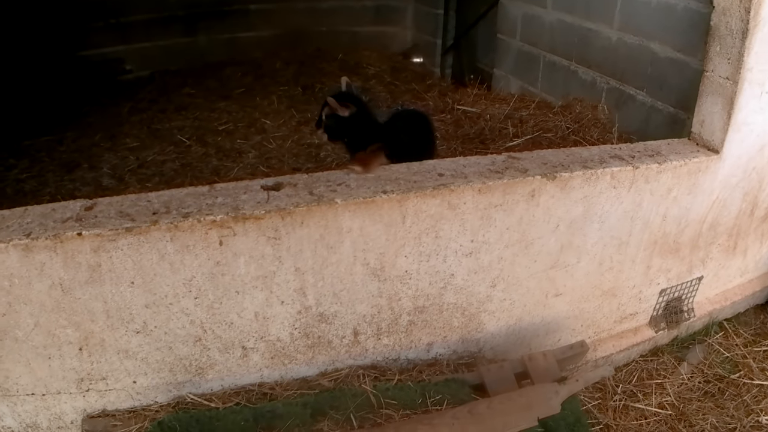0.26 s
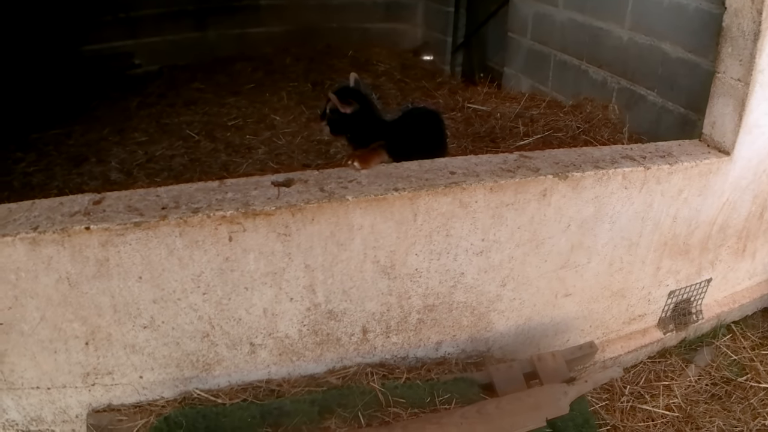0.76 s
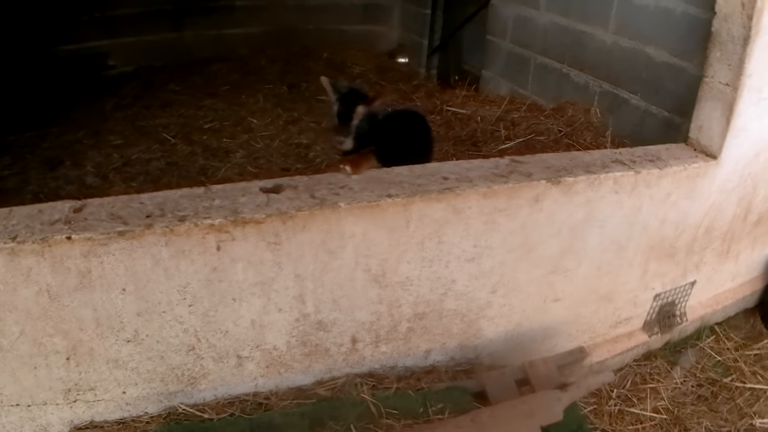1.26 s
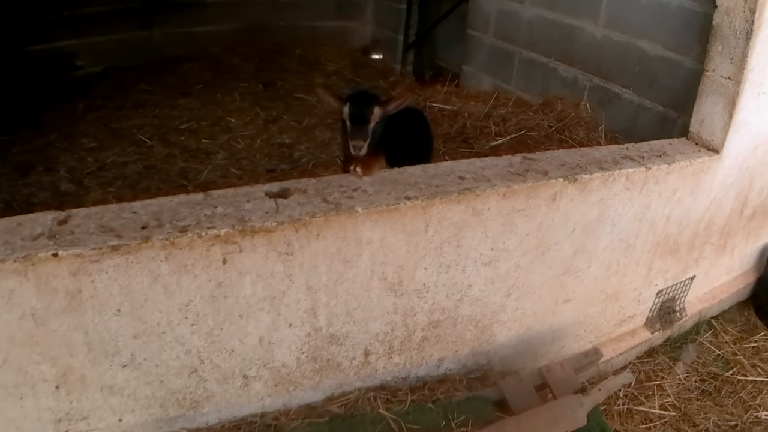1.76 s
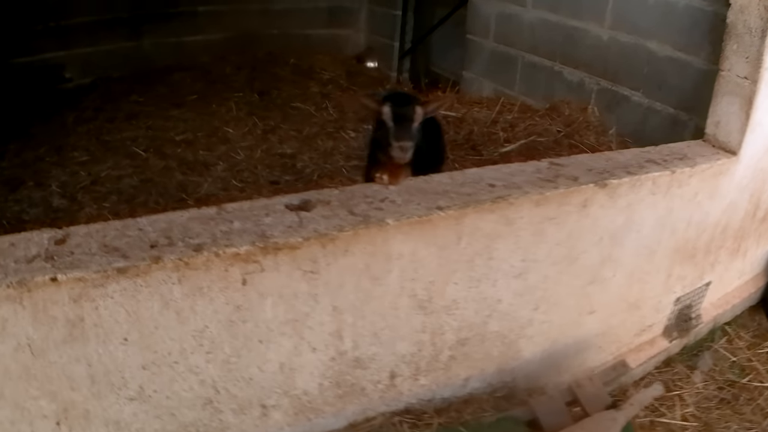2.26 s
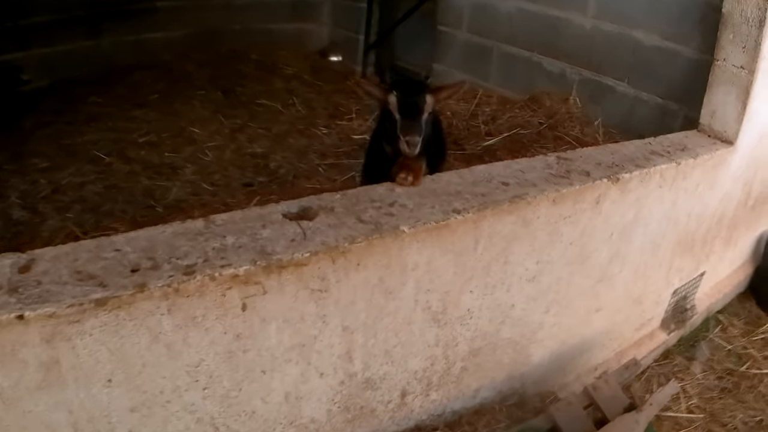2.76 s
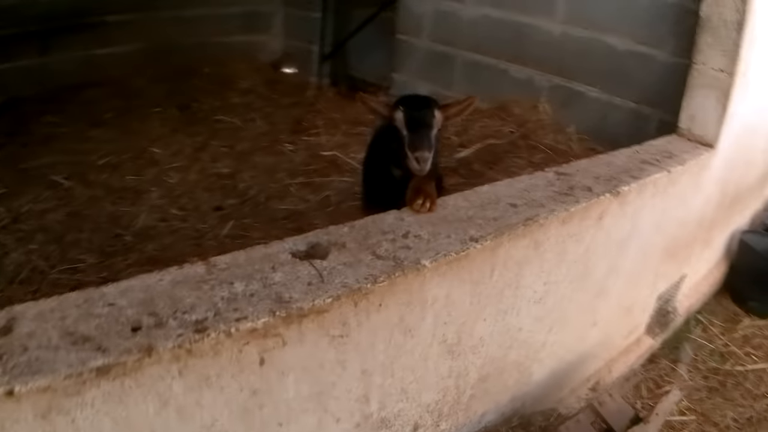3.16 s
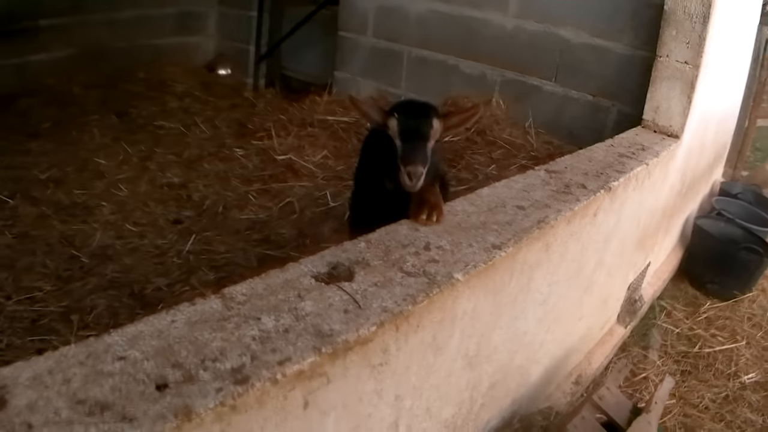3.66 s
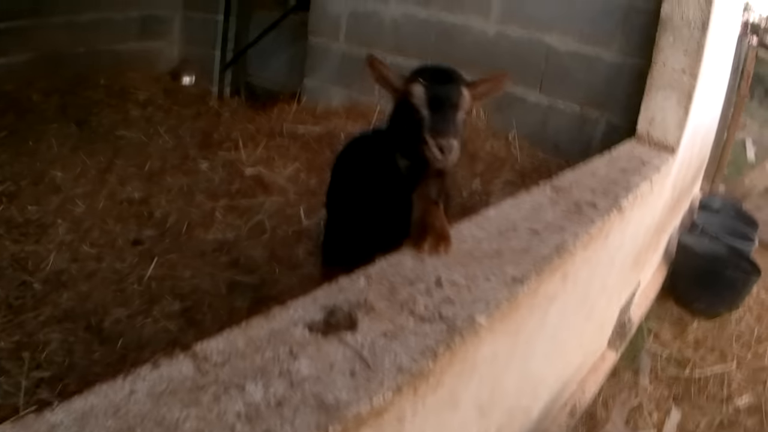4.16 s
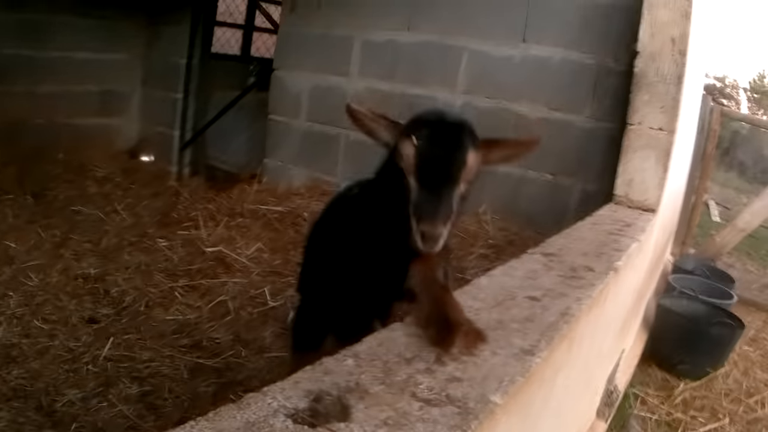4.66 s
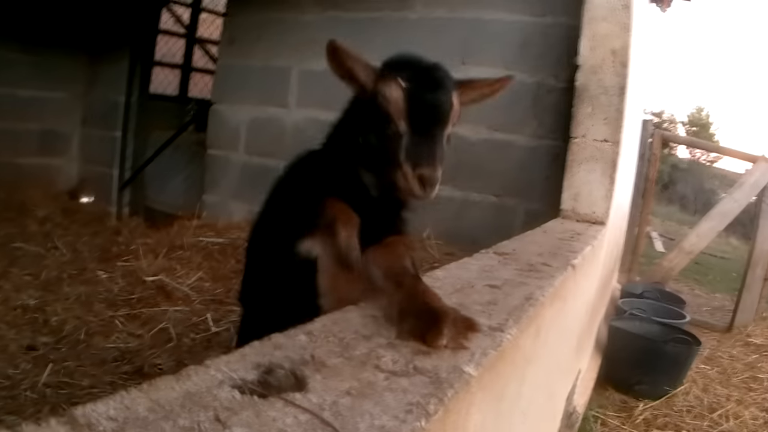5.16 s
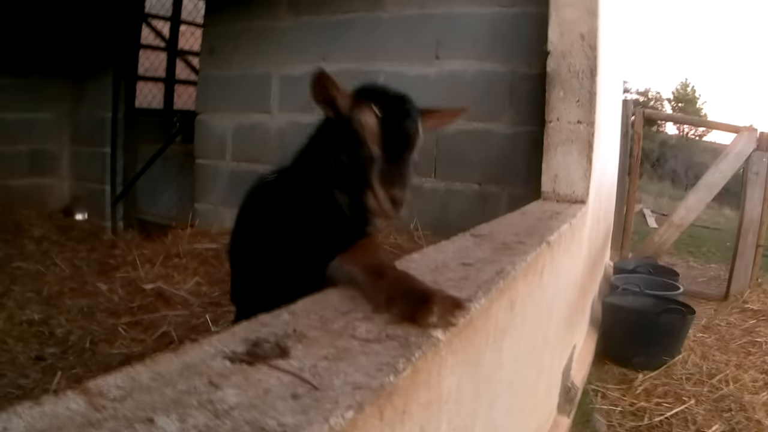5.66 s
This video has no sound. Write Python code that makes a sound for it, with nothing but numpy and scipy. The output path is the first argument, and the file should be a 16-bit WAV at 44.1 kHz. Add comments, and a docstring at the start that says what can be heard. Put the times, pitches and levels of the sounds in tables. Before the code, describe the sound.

A young goat moves in a straw-bedded block pen. Its dull metal bell clanks and hooves thud at first; one short, high, quavering bleat follows. After a sparser stretch, straw rustles and the bell clatters rapidly as it climbs at the low wall, ending with a few knocks. A close handheld microphone picks up low rumble and slight room echo.

```python
"""Goat kid with a neck bell

A goat kid shifts about in a straw-bedded block pen and climbs onto the low wall, close by. Its sheet-metal bell
clanks: a choked main note with a beating partner, overtones and clapper ticks. It bleats once, quavering:
harmonics through mouth and throat colours, with puffs of breath. Hooves ring and thud, straw noise rustles and
snaps, air rumbles on the microphone, and soft low bumps sound."""
import sys
import numpy as np
from scipy import signal
from scipy.io import wavfile

SR = 44100
rng = np.random.default_rng(int(sys.argv[2]) if len(sys.argv) > 2 else 0)


def waveform_to_disk(signal):
    """Save audio, clipped to [-1, 1], as 16-bit WAV at the path in sys.argv[1]."""
    frames = np.transpose(np.atleast_2d(signal))
    scaled = np.clip(frames, -1, 1) * 32767
    samples = np.round(scaled).astype(np.int16)
    wavfile.write(sys.argv[1], SR, samples)


N = 261072
TIME = np.arange(N) / SR

# All layer levels are relative; the functions add gains.
# air rumble on the microphone: (time [s], level [dB])
AIR_LEVEL = [(0, -41.5), (0.3, -36), (0.55, -39.5), (1.85, -39.5), (2.0, -45), (2.27, -42.5), (2.45, -37),
             (4.4, -39.5), (5.1, -36), (5.92, -37)]
# soft low bumps: (time [s], level [dB], pitch [Hz])
LOW_BUMPS = [(0.277,-25,55),(0.566,-22,50),(0.659,-18.5,60.5),(0.956,-21.5,64.1),(1.286,-16,62),(1.472,-19.5,55.2),(1.848,-21.5,74.5),
             (2.527,-20.5,50.6),(5.028,-23,53.3),(5.604,-18,40),(5.836,-24,71.6)]
# rumble spectrum: (frequency [Hz], density [dB per Hz])
RUMBLE_SPECTRUM = [(18, 1.5), (35, -7), (70, -8.5), (130, -13), (300, -17.5), (800, -61.5)]
# straw rustle spectrum: (frequency [Hz], density [dB per Hz])
RUSTLE_SPECTRUM = [(600, 7.5), (1100, 12.5), (1500, 3.5), (2000, 3.5), (2600, 4.5), (3200, -7.5),
                   (3800, -7), (4500, -16), (5200, -24.5), (6500, -35), (8500, -68.5)]
# dull shuffling spectrum: (frequency [Hz], density [dB per Hz])
SHUFFLE_SPECTRUM = [(60, -5), (130, -1.5), (300, 0), (600, -3), (1000, -6), (1600, -11.5), (2500, -27),
                    (4000, -30.5)]
# moves that stir the straw: (peak time [s], peak level [dB], rise by 20 dB [s], t60 [s])
STRAW_MOVES = [(0.3, -41, 0.023, 0.076), (0.99, -45.5, 0.049, 0.18), (1.38, -50.5, 0.02, 0.13),
               (1.519, -56, 0.13, 2.53), (2.15, -47, 0.49, 0.9), (2.741, -41, 0.032, 0.094),
               (3.42, -46.5, 0.11, 1.8), (3.79, -37.5, 0.04, 2), (3.968, -38, 0.29, 1.43),
               (4.52, -41.5, 0.78, 0.94), (5.899, -51, 1, 2.6)]
# dry stalks sliding: (peak time [s], peak level [dB], rise by 20 dB [s], t60 [s])
STALK_SWISHES = [(0.05,-55,0.09,.5),(0.53,-57,.1,0.47),(0.95,-64,0.028,.25),(1.19,-53,0.14,0.24),(1.47,-52.5,.1,0.49),(2.2,-44,.3,0.44),(2.51,-54.5,0.1,0.46),(3.45,-54.5,0.21,.6),(3.92,-47,0.37,1.65)]
# harsh resonances of hard scrambling: (frequency [Hz], level [dB])
SCRAMBLE_RASP = [(1660, -18), (2417, -1.5), (2560, -2), (2760, -4.5)]
# straw stalks snapping: (time [s], level [dB], centre [Hz])
STALK_SNAPS = [(0.2885,-27,3410),(0.2996,-28,3430),(0.3074,-34,3280),(0.401,-43,3204),(0.44,-39,1993),(2.35,-32.5,2420),
               (2.643,-39,2285),(2.718,-24,1984),(2.725,-30.5,2800),(2.737,-38.5,2320),(3.883,-17.5,2363),(5.021,-37,2885),(5.173,-29,2380)]
# hoof steps, low on straw, high on the bare wall: (time [s], hollow ring [dB], ring pitch [Hz],
# t60 of thud and knock [s], thud [dB], knock [dB], grit [dB])
HOOF_STEPS = [(0.615,-14.5,352,0.21,-23.5,-26,-34.5),(0.657,-14,281,0.071,-17.5,-34.5,-54),(0.713,-35,151.4,0.37,-24,-32.5,-46),
              (0.826,-24.5,1370,0.051,-40.5,-38.5,-36.5),(1.034,-13.5,376.2,0.12,-26,-24,-31.5),(1.174,-17,312,0.27,-34.5,-26.5,-42.5),
              (1.221,-19,150,0.07,-28.5,-36,-33.5),(1.376,-25,400,0.063,-45.5,-29.5,-55),(1.457,-13,170.5,0.076,-19.5,-46.5,-53.5),
              (1.544,-33,190,0.11,-31.5,-25,-45),(1.617,-22,189,0.067,-32.5,-20.5,-35.5),(2.35,-16.5,333,0.2,-23.5,-19,-33),
              (2.38,-19,386,0.24,-45.5,-31.5,-41.5),(2.462,-17.5,319,0.069,-36.5,-30.5,-43),(2.522,-20,217,0.055,-31.5,-31,-54),
              (2.644,-17,707.4,0.061,-31,-18.5,-31.5),(2.72,-13.5,684.5,0.085,-37.5,-13.5,-26),(2.736,-18,993,0.094,-29,-20.5,-24.5),
              (3.588,-24,666.5,0.11,-33.5,-22.5,-31),(3.839,-14,327,0.47,-30,-28,-42),(4.164,-12,358.2,0.2,-31.5,-25.5,-38.5),(4.184,-15.5,323,0.09,-40.5,-29.5,-43),
              (4.295,-14,225.9,0.17,-26,-24.5,-32),(4.575,-26.5,487,0.055,-28.5,-28,-34),(5.277,-7,477.7,0.19,-22.5,-14.5,-43),(5.332,-16,512,0.18,-29.5,-35,-37.5),
              (5.435,-30.5,154.8,0.13,-24.5,-26.5,-47),(5.832,-12,190,0.13,-22.5,-55,-48)]
# arch of the bleat as the mouth opens and shuts: (time [s], pitch before the quaver [Hz],
# fundamental [dB], mouth resonance [dB], overtones [dB])
BLEAT_ARCH = [(1.79,367.6,-58.5,-64,-74.5),(1.82,424.4,-23.5,-40.5,-66),(1.85,580.6,-27,-31.5,-50),(1.905,570,-30,-37.5,-48.5),(1.945,565,-20,-26,-33.5),(1.985,582,-32,-28,-41.5),
              (2.04,588.5,-33.5,-15.5,-31.5),(2.13,589,-33,-11,-35),(2.18,595,-32.5,-14.5,-30),(2.215,599,-30,-12,-28.5),(2.252,588,-33,-13.5,-31),
              (2.278,496,-32,-22,-25.5),(2.293,418,-37,-19,-30.5),(2.301,398,-49.5,-24,-33),(2.335,369,-57,-43,-56)]
# instants where the voice catches: (time [s])
VOICE_BREAKS_S = [2.066, 2.088, 2.161, 2.195]
# throat colour above the mouth resonance: (frequency [Hz], level [dB])
THROAT_COLOUR = [(1500, -45.5), (1800, -11.5), (2400, -1), (3000, -21), (3600, -17.5), (4200, -22.5),
                 (4800, -19), (5400, -48), (6100, -30.5), (7300, -36), (8600, -46.5), (9600, -60)]
# clapper blows and bounces: (time [s], main note level [dB], nominal pitch [Hz], rise [s], t60 [s],
# first overtone family [dB], second family [dB], upper family [dB])
BELL_STRIKES = [(0.073, -15.0, 854, 0.022, 0.088, -62, -60, -64),
                (0.169, -8.5, 855, 0.008, 0.27, -54, -55, -64),
                (0.214, -24, 862, 0.016, 0.12, -56, -53, -67),
                (0.318, -24.5, 848, 0.005, 0.22, -62.5, -55, -62.5),
                (0.491, -6.5, 857, 0.0083, 0.22, -36, -44, -47),
                (0.535, -9, 858, 0.027, 0.053, -35.5, -46, -46.5),
                (0.588, -18.5, 844, 0.0076, 0.45, -38.5, -49, -53.5),
                (0.607, -8.5, 841, 0.009, 0.28, -44.5, -51, -55.5),
                (0.663, -14, 860, 0.0077, 0.14, -49, -53.5, -57),
                (0.712, -17.5, 847, 0.0095, 0.16, -59.5, -48.5, -66),
                (0.784, -17, 834, 0.014, 0.09, -47, -55, -69),
                (0.815, -19.5, 858, 0.005, 0.42, -49, -53, -69),
                (0.895, -24, 847, 0.017, 0.4, -53, -60, -72.5),
                (1.085, -28, 855, 0.009, 0.38, -56, -58, -71),
                (1.21, -18, 864, 0.0087, 0.26, -50, -56, -69),
                (1.309, -19.5, 858, 0.0061, 0.24, -66, -63, -67),
                (1.562, -24, 851, 0.041, 0.1, -52.5, -60, -62.5),
                (1.713, -19.0, 866, 0.034, 0.071, -43, -57, -69),
                (1.87, -24, 874, 0.0039, 0.12, -55, -53, -71),
                (2.418, -26.5, 870, 0.0048, 0.27, -51, -62, -69),
                (2.865, -27.5, 851, 0.018, 0.34, -59, -58, -65),
                (3.044, -17.5, 837, 0.0086, 0.29, -45.5, -49.5, -78),
                (3.345, -19.5, 849, 0.01, 0.3, -51, -68, -57),
                (3.529, -9.5, 851, 0.0099, 0.12, -40.5, -57, -64),
                (3.545, -6.5, 850, 0.021, 0.18, -38.5, -49, -56.5),
                (3.663, -6, 848, 0.0076, 0.04, -44, -38, -50.5),
                (3.679, -8, 831, 0.0041, 0.25, -55, -51, -56),
                (3.714, -10, 830, 0.0071, 0.21, -45, -43.5, -54),
                (3.771, -3.5, 836.4, 0.053, 0.26, -32, -40, -51),
                (3.866, -4.5, 862, 0.009, 0.25, -37, -34, -38.5),
                (3.884, -4, 864, 0.012, 0.088, -36.5, -38.5, -39),
                (3.912, -17, 851, 0.0048, 0.37, -38.5, -46, -40.5),
                (3.94, -13.5, 849, 0.009, 0.51, -51.5, -38, -42.5),
                (4.015, -3.5, 871, 0.009, 0.21, -35.5, -34.5, -38.5),
                (4.035, -8.5, 877, 0.005, 0.53, -38, -29, -35),
                (4.053, -4, 858, 0.0055, 0.041, -33.5, -30.5, -42),
                (4.089, -9.0, 868, 0.012, 0.046, -34.5, -31, -44),
                (4.108, -13.5, 850, 0.0044, 0.34, -40.5, -33, -47.5),
                (4.218, -6, 854, 0.012, 0.04, -50.5, -42, -68),
                (4.24, -11.5, 844, 0.0036, 0.1, -56, -41.5, -72),
                (4.259, -13, 837, 0.006, 0.11, -50, -36.5, -68),
                (4.277, -6.5, 869, 0.017, 0.12, -59, -48.5, -55),
                (4.298, -9.5, 864, 0.0057, 0.18, -52, -39.5, -54.5),
                (4.332, -17.5, 874, 0.003, 0.24, -54.5, -48.5, -56),
                (4.446, -4.0, 837, 0.011, 0.044, -47, -35.5, -52.5),
                (4.48, -10.5, 851, 0.013, 0.11, -42, -33, -49.5),
                (4.53, -13.0, 829, 0.0099, 0.19, -44.5, -32.5, -51.5),
                (4.59, -18.5, 823, 0.0072, 0.25, -57, -43.5, -54.5),
                (4.722, -9.5, 849, 0.024, 0.27, -60, -39.5, -54.5),
                (4.82, -11.5, 850, 0.011, 0.45, -55.5, -41, -62),
                (4.845, -10, 848, 0.0049, 0.25, -51.5, -36.5, -67),
                (4.865, -10.5, 844, 0.0082, 0.13, -46, -42, -65),
                (4.98, -19.5, 836, 0.015, 0.16, -65.5, -64, -61.5),
                (5.067, -19.5, 847, 0.008, 0.11, -73, -57, -76),
                (5.103, -13, 849, 0.0074, 0.18, -51.5, -48, -69),
                (5.138, -21.5, 845, 0.012, 0.45, -60, -50.5, -59.5),
                (5.215, -10.5, 873, 0.013, 0.079, -46, -45, -57.5),
                (5.255, -12.5, 861.5, 0.056, 0.2, -49, -45, -56.5),
                (5.323, -10.5, 865.5, 0.026, 0.054, -48, -48.5, -60),
                (5.39, -27, 856, 0.0039, 0.31, -53, -46, -68),
                (5.696, -9.5, 879, 0.0094, 0.12, -46.5, -34.5, -48.5),
                (5.744, -20.5, 846, 0.0077, 0.23, -46, -42.5, -57)]
# bell overtones: (frequency [Hz], level [dB], t60 [s], family: 0 first, 1 second, 2 upper, 3 top)
BELL_OVERTONES = [(1572, -14, .1, 0), (1982, 1, .85, 0), (1998, -15, .35, 0), (2174, .5, .72, 1),
                  (2194, -15, .35, 1), (2344, -20, .3, 1), (2557, -20, .5, 1), (3779, -8, .5, 2),
                  (3814, -1, .55, 2), (4355, -12, .28, 2), (5947, -25, .25, 2), (4859, 0, .35, 3),
                  (5940, -12, .22, 3)]
# hard blows on the rim bring out the top family: (time [s], level against the upper family [dB])
RIM_BLOWS = [(0.49, -29.5), (0.54, -30), (0.6, -19.5), (3.55, -9.5), (3.663, -11), (3.773, -8),
             (3.9, -28.5), (4.014, -5), (4.22, -7.5), (4.5, -17), (5.7, -23)]
# noise spectra of swish, grit and breath: (frequency [Hz], density [dB per Hz])
SWISH_SPECTRUM = [(3500, -1.0), (4000, 6.0), (4600, -14.5), (5100, -25.5)]
GRIT_SPECTRUM = [(750, 9), (1200, 10.5), (1800, -8.5), (2500, -7.0), (3300, -30.0), (4800, -35.0)]
BREATH_SPECTRUM = [(700, 1.0), (1200, 29.0), (1800, 10.0), (2500, 10.0),
                   (3300, -13.5), (4700, -10.5), (6000, -34), (8000, -36)]

PEN_T60_S, WALL_CUT_HZ, PEN_DB = 0.61, 1300, -22.5
HISS_DB = -74
STIR_DB, SHUFFLE_DB, SWISH_DB = -57.5, -37.5, -8  # rustle between moves; shuffling; swish rest against STIR
SHUFFLE_PATCHY_DB, RASP_WIDTH_HZ = 3, 160
RING_T60_S, GRIT_PER_S = 0.063, 750
QUAVER_HZ, QUAVER_CREST_S = 11.27, 2.04  # rate; time of one crest
QUAVER_DEPTH, QUAVER_DB = 0.028, 1.5  # pitch swing at that crest [share]; mouth level swing
FALL_S, FALL_ROUGH = 2.25, .45  # voice falls away from here; hoarseness added
OFFSET, HEADROOM, STOPBAND_HZ = -.24, .85, 11000


def from_db(db):
    """Decibels to gain."""
    return 10 ** (np.asarray(db) / 20)


def rms_one(x):
    """Scale to rms 1."""
    return x / np.sqrt(np.mean(x ** 2) + 1e-20)


def in_time(rows):
    """Columns of a curve, sample by sample."""
    s, *columns = np.transpose(rows)
    return [np.interp(TIME, s, c) for c in columns]


def at_hz(points, hz):
    """Read a spectrum on a log-frequency axis."""
    point_hz, level_db = np.transpose(points)
    return np.interp(np.log(hz), np.log(point_hz), level_db)


def band(x, low_hz, high_hz, order=2):
    """Butterworth band-pass."""
    sos = signal.butter(order, [low_hz, high_hz], "band", fs=SR, output="sos")
    return signal.sosfilt(sos, x + 1e-18)


def soften(x, seconds):
    """Two one-pole lags: a step becomes a smooth rise."""
    r = np.exp(-1 / (seconds * SR))
    return signal.lfilter([(1 - r) ** 2], [1, -2 * r, r * r], x + 1e-18)


def drift(rate_hz):
    """Slow random wander with spread 1: low-passed noise on every 40th sample, interpolated."""
    step = 40
    r = np.exp(-2 * np.pi * rate_hz * step / SR)
    white = rng.standard_normal(N // step + 2002)
    slow = signal.lfilter([1], [1, -2 * r, r * r], white)[2000:]  # drop the filter's start
    return np.interp(np.arange(N) / step, np.arange(len(slow)), rms_one(slow))


def noise(spectrum, patchy_db, envelope=1):
    """Noise in narrow bands, each flickering by itself; rms 1 where the envelope is 1."""
    out, power = 0, 0
    white = rng.standard_normal((2, N)) * envelope
    bottom_hz, top_hz = spectrum[0][0], spectrum[-1][0]
    edges_hz = np.geomspace(bottom_hz, top_hz, int(2.6 * np.log2(top_hz / bottom_hz)) + 2)
    for k, (low, high) in enumerate(zip(edges_hz, edges_hz[1:])):
        gain = from_db(at_hz(spectrum, np.sqrt(low * high)) + patchy_db * drift(15))
        # neighbouring bands use separate noise
        out = out + band(white[k % 2], low, high, order=3) * gain
        power += np.mean(gain ** 2) * (high - low) / (SR / 2)
    return out / np.sqrt(power)


def bursts(envelope, low_hz, high_hz):
    """Noise bursts ringing through one band; the envelope sets their rms."""
    white = envelope * rng.standard_normal(N)
    return band(white, low_hz, high_hz, order=3) * np.sqrt(SR / 2 / (high_hz - low_hz))


def grains(per_s):
    """Random instants of contact, mean power 1: noise under this gate crackles."""
    return (rng.random(N) < per_s / SR) * np.sqrt(SR / per_s)


def dying(starts_s, level_db, t60_s):
    """Sum of envelopes that jump up at each start and die away."""
    out = np.zeros(N)
    for s, db, t60 in zip(starts_s, level_db, np.broadcast_to(t60_s, len(starts_s))):
        at = int(s * SR)
        age = TIME[:min(N - at, int(2 * t60 * SR))]
        out[at:at + len(age)] += from_db(db - 60 * age / t60)
    return out


def struck(s, db, hz, t60_s):
    """One damped swing set off at time s."""
    out, at = np.zeros(N), int(s * SR)
    age = TIME[:min(N - at, int(2 * t60_s * SR))]
    out[at:at + len(age)] = from_db(db - 60 * age / t60_s) * np.sin(2 * np.pi * hz * age)
    return out


def swells(rows, rest_db):
    """Level [dB]: each move swells by 20 dB over its rise and dies away, over a steady rest level."""
    power = from_db(rest_db) ** 2
    for s, peak_db, rise, t60 in rows:
        below_peak_db = np.maximum(20 * (s - TIME) / rise, 60 * (TIME - s) / t60).clip(max=100)
        power = power + from_db(peak_db - below_peak_db) ** 2
    return 10 * np.log10(power)


def air(rumble_db=5.0, bump_db=4.5, bump_t60_s=0.15):
    """Low rumble and faint hiss on the microphone, with soft low bumps as damped low swings."""
    swings = sum(struck(s, db + bump_db, hz, bump_t60_s) for s, db, hz in LOW_BUMPS)
    bumps = soften(swings, 0.00015)
    rumble = from_db(in_time(AIR_LEVEL)[0] + rumble_db) * noise(RUMBLE_SPECTRUM, patchy_db=5.0)
    hiss = bursts(from_db(HISS_DB), 4600, 4850)
    return bumps + rumble + hiss


def pen(x, count=10):
    """Echoes circle between the block walls, duller on every round."""
    out, dull = np.zeros(N), np.exp(-2 * np.pi * WALL_CUT_HZ / SR)
    lags = (rng.uniform(.011, .045, count) * SR).astype(int)
    for k, lag in enumerate(lags):
        loop, state = x.copy(), [0.]
        gain = from_db(-60 * lag / SR / PEN_T60_S)
        for i in range(lag, N, lag):
            back, state = signal.lfilter([gain * (1 - dull)], [1, -dull], loop[i - lag:i], zi=state)
            loop[i:i + lag] += back[:N - i]
        out += (loop - x) * (-1) ** k
    return out


def straw(rustle_db=9, grain_db=2.43, scramble_db=3, effort_db=-34, shuffle_follows=0.75,
          crackle_share=0.28, crackles_per_s=700):
    """Bedding rustles and crackles in clumps under the feet, with shuffling, swishes and rasp."""
    stir_db, air_db = swells(STRAW_MOVES, STIR_DB), in_time(AIR_LEVEL)[0]
    clumps = from_db(stir_db + grain_db * drift(150))
    crackle = np.sqrt(1 - crackle_share + crackle_share * grains(crackles_per_s) ** 2)
    rustle = noise(RUSTLE_SPECTRUM, 2.4, clumps * crackle * from_db(rustle_db))
    # shuffling partly follows the air level
    shuffle_gain = from_db(SHUFFLE_DB + shuffle_follows * (air_db - air_db.mean()))
    shuffle = shuffle_gain * noise(SHUFFLE_SPECTRUM, SHUFFLE_PATCHY_DB)
    # dry stalks swish as they slide over each other
    swish = noise(SWISH_SPECTRUM, 2.6, from_db(swells(STALK_SWISHES, STIR_DB + SWISH_DB)))
    # hard scrambling adds a harsh, ringing rasp
    scramble = clumps * np.minimum(from_db(stir_db - effort_db), 1)
    half_hz = RASP_WIDTH_HZ / 2
    rasp = sum(bursts(scramble * from_db(scramble_db + db), hz - half_hz, hz + half_hz)
               for hz, db in SCRAMBLE_RASP)
    return rustle + shuffle + swish + rasp


def snaps(t60_s=0.018, spread=1.434, fibres_per_s=5000):
    """A stalk breaks in a quick run of fibre cracks, coloured by its thickness."""
    cracks = grains(fibres_per_s) * rng.choice([-1, 1], N)
    out = np.zeros(N)
    for s, db, hz in STALK_SNAPS:
        near = slice(int(s * SR), int((s + 3 * t60_s) * SR))
        low, high = hz / spread, hz * spread
        run = (dying([s], [db], t60_s) * cracks)[near]
        out[near] += band(run, low, high, order=4) * np.sqrt(SR / 2 / (high - low))
    return out


def hooves(grit_db=7.5, grit_share=0.73, give_s=0.00045):
    """Each hoof gives a short hollow ring, a thud, a knock and a crackle of crushed grit."""
    s, ring_db, ring_hz, t60, thud_db, knock_db, step_grit_db = np.transpose(HOOF_STEPS)
    ring = sum(struck(start, db, hz, RING_T60_S) for start, db, hz in zip(s, ring_db, ring_hz))
    thud = bursts(soften(dying(s, thud_db, t60), give_s), 120, 340)
    knock = bursts(soften(dying(s, knock_db, t60), give_s), 340, 780)
    crush = dying(s, step_grit_db + grit_db, t60 * grit_share) * grains(GRIT_PER_S)
    grit = noise(GRIT_SPECTRUM, 0.4, crush)
    return band(ring + thud + knock, 55, 2300) + grit


def bleat(mouth_hz=1200, mouth_width_hz=330, overtone_quaver_db=0.5, narrow_s=0.25, jitter=0.048,
          shimmer=0.22, rasp_db=-14, hoarse_dull_db=8, tremble_db=2.9, clear_rough=0.05, dip_rough=0.14,
          break_s=0.0019, break_depth=0.55, slip=1.0, crack=3.4, unevenness=0.019):
    """A high voice through the open mouth's resonance; rougher in quaver dips and as it falls away."""
    pitch_hz, low_db, mouth_db, high_db = in_time(BLEAT_ARCH)
    start_s, end_s = BLEAT_ARCH[0][0], BLEAT_ARCH[-1][0]
    # broad crests, narrow dips; the pitch swing narrows as the call goes on
    quaver = 1 - 2 * np.abs(np.sin(np.pi * QUAVER_HZ * (TIME - QUAVER_CREST_S))) ** 3
    depth = QUAVER_DEPTH * np.exp(np.clip((QUAVER_CREST_S - TIME) / narrow_s, -1, .5))
    pitch_hz = pitch_hz * (1 + depth * quaver)
    mouth_db = mouth_db + QUAVER_DB * quaver
    # overtones swell on the crests; dips get rougher with effort
    high_db = high_db + overtone_quaver_db * quaver
    effort_db = mouth_db + 13
    rough = clear_rough + dip_rough * np.maximum(-quaver, 0) * from_db(effort_db / 2)
    rough = rough + FALL_ROUGH * np.clip((TIME - FALL_S) / 0.028, 0, 1)
    pitch_hz = soften(pitch_hz - pitch_hz[0], 0.0028) + pitch_hz[0]
    phase = 2 * np.pi * np.cumsum(pitch_hz * (1 + jitter * rough * drift(80))) / SR
    # uneven cycles fray the highest harmonics
    phase += unevenness * (1 + 2 * rough) * drift(300)
    # at each break the folds falter and slip out of step
    catch = sum(np.exp(-((TIME - s) / break_s) ** 2) for s in VOICE_BREAKS_S)
    phase -= slip * np.cumsum(catch) / (break_s * SR * np.sqrt(np.pi))
    voiced = (TIME > start_s) & (TIME < end_s)
    k = np.arange(2, 17)[:, None]  # harmonic numbers
    hz = k * pitch_hz[voiced]
    mouth = 1 / (1 + ((hz - mouth_hz) / mouth_width_hz) ** 4)
    mouth = mouth / np.linalg.norm(mouth, axis=0)
    # hoarse folds close softly and lose their top harmonics
    dull_db = hoarse_dull_db * rough[voiced] * (hz / 3000) ** 2
    throat = from_db(at_hz(THROAT_COLOUR, hz) - dull_db) / (1 + (1500 / hz) ** 16)
    gains = from_db(mouth_db[voiced]) * mouth + from_db(high_db[voiced]) * throat
    # higher harmonics tremble more in strength
    tremble = np.array([drift(44)[voiced] for _ in k])
    gains = gains * from_db(tremble_db * np.log(k / 2) * tremble)
    voice = from_db(low_db) * np.sin(phase) * voiced
    voice[voiced] += np.sum(gains * np.sin(k * phase[voiced]), axis=0)
    voice *= np.sqrt(2) * (1 + shimmer * rough * drift(99)) * (1 - break_depth * catch)
    voice *= np.clip((end_s - TIME) / .01, 0, 1)
    # air escapes once per cycle of the folds, and in a spurt at each break
    puffs = (1 + np.cos(phase)) * voiced * from_db(high_db + rasp_db)
    puffs = puffs * (0.89 + 4.3 * rough + crack * catch)
    return voice + noise(BREATH_SPECTRUM, 0.86, puffs)


def last_blow(s):
    """Per sample: index of the last blow at times s, and seconds since it (1 before the first)."""
    blow = np.maximum(np.searchsorted(s, TIME, side="right") - 1, 0)
    return blow, np.where(TIME >= s[0], TIME - s[blow], 1)


def bell_metal(overtone_db=4.5, rise_s=0.0003, tick_db=-33, tick_t60_s=0.032, waver=.22, phase_jump=.7):
    """Sheet-metal overtones ring at fixed pitches, rattling slightly; the clapper adds a faint tick."""
    s, peak_db, _, _, _, first_db, second_db, upper_db = np.transpose(BELL_STRIKES)
    top_db = upper_db + np.interp(s, *np.transpose(RIM_BLOWS))
    families_db = [first_db, second_db, upper_db, top_db]
    blow, age = last_blow(s)
    out = bursts(dying(s, peak_db + tick_db, tick_t60_s), 950, 2800)
    for hz, db, t60, family in BELL_OVERTONES:
        level = from_db(families_db[family][blow] + db + overtone_db - 60 * age / t60)
        # every blow jolts the phase of the ring
        jolt = np.exp(1j * np.cumsum(phase_jump * rng.standard_normal(len(s))))[blow]
        rattle = 1 + waver * (drift(25) + 1j * drift(30))
        out += np.real(soften(level * jolt, rise_s) * rattle * np.exp(2j * np.pi * hz * TIME))
    return out


def bell_note(sharp_hz=30, settle_s=0.009, flat_hz=8, split_hz=42, partner_db=-17, touch_s=0.0046,
              wobble=0.13, swell_power=0.65):
    """Hollow main note: the landing clapper chokes it, it swells anew, and a close partner mode beats."""
    s, peak_db, pitch_hz, rise, t60 = np.transpose(BELL_STRIKES)[:5]
    blow, age = last_blow(s)
    until_next = np.append(s[1:], np.inf)[blow] - TIME
    swell = np.sin(np.pi / 2 * np.clip(age / rise[blow], 0, 1)) ** swell_power
    choke = np.sin(np.pi / 2 * np.clip(until_next / touch_s, 0, 1))
    decay_db = 60 * np.maximum(age - rise[blow], 0) / t60[blow]
    level = from_db(peak_db[blow] - decay_db) * swell * choke
    # starts sharp, settles flat_hz below the nominal pitch
    note_hz = pitch_hz[blow] + sharp_hz * np.exp(-age / settle_s) - flat_hz
    phase = 2 * np.pi * np.cumsum(note_hz) / SR
    beat = 2 * np.pi * (split_hz * age + rng.random(len(s))[blow])
    start_phase = np.exp(2j * np.pi * rng.random(len(s)))[blow]
    swing = start_phase * (1 + from_db(partner_db) * np.exp(1j * beat))
    # as the bell swings against the neck, its ring wavers more, up to a limit
    waver = 1 + wobble * np.minimum(age / (2 * rise[blow]), 2) * (drift(20) + 1j * drift(68))
    return np.real(soften(level * swing * waver, .0004) * np.exp(1j * phase))


def scene():
    """The goat and its bedding, their echoes in the pen, and the air at the microphone."""
    goat = straw() + snaps() + hooves() + bleat() + bell_metal() + bell_note()
    return (air() + from_db(PEN_DB) * pen(goat) + goat)[None]


def record(dry):
    """Downward peaks round off softly, the whole shifts off centre, and the top is cut."""
    rounded = np.where(dry > 0, dry, HEADROOM * np.tanh(dry / HEADROOM)) + OFFSET
    return signal.sosfilt(signal.cheby2(12, 60, STOPBAND_HZ, fs=SR, output="sos"), rounded)


dry = scene()
out = record(dry)
waveform_to_disk(out)
```